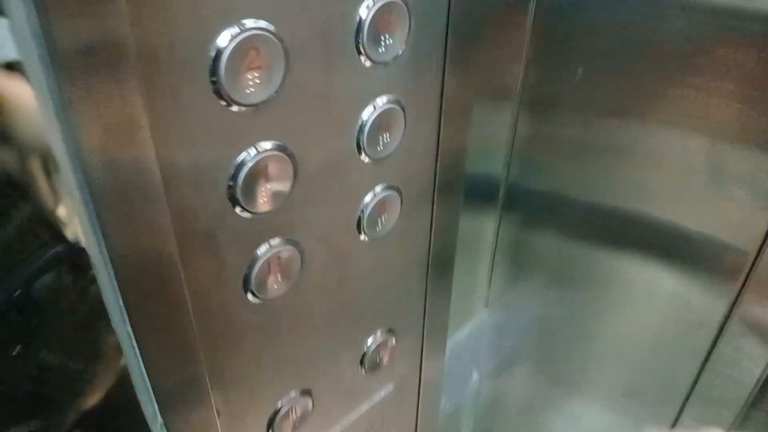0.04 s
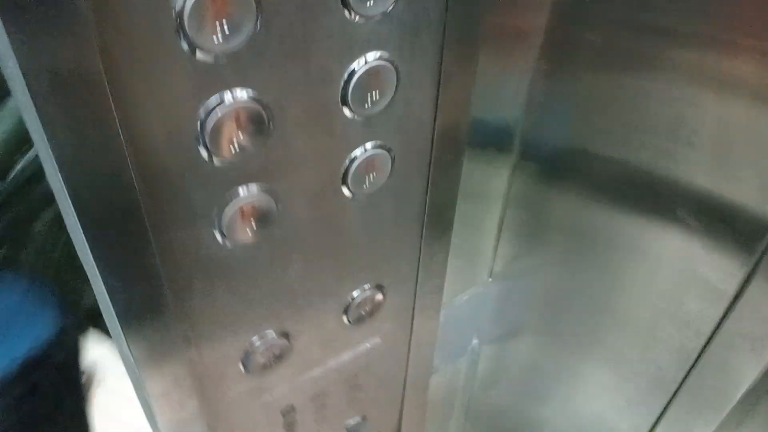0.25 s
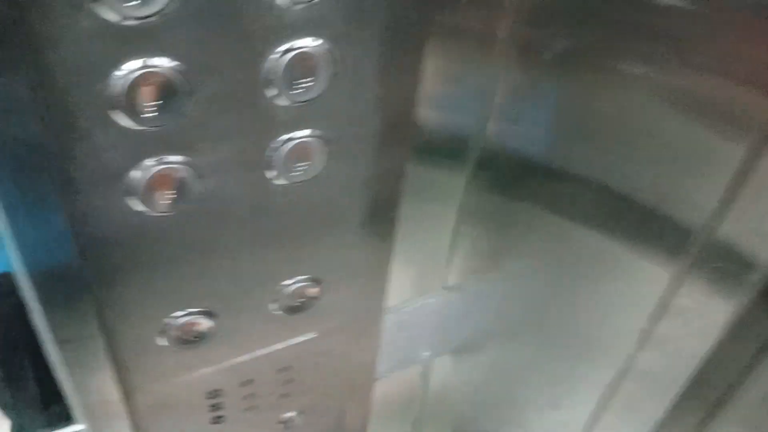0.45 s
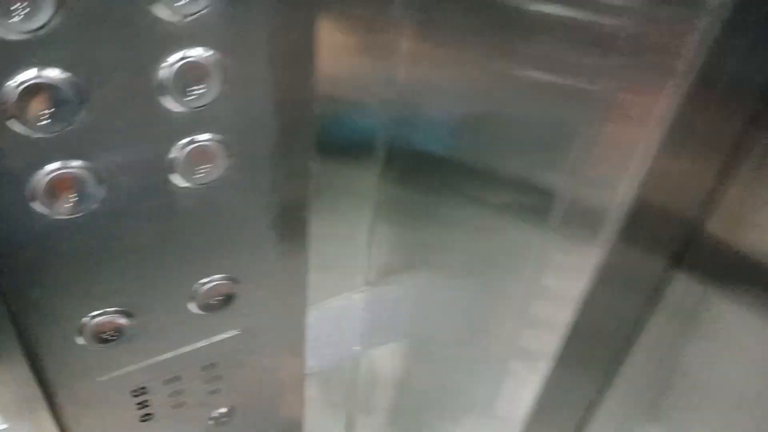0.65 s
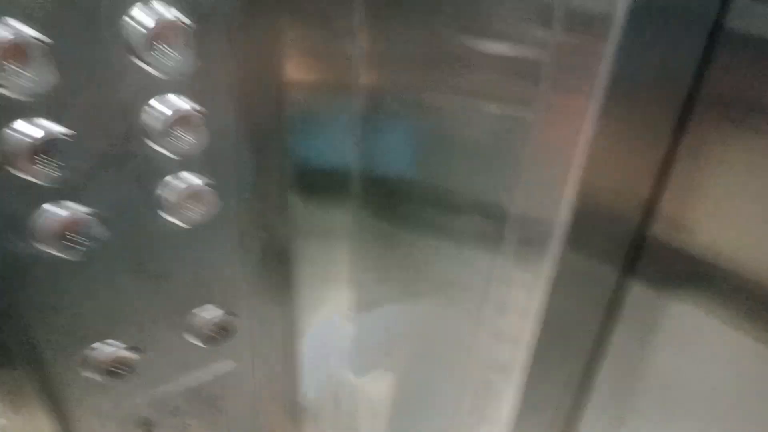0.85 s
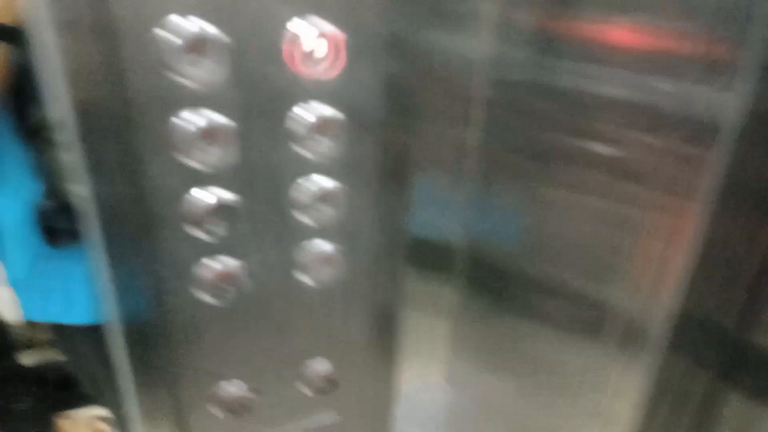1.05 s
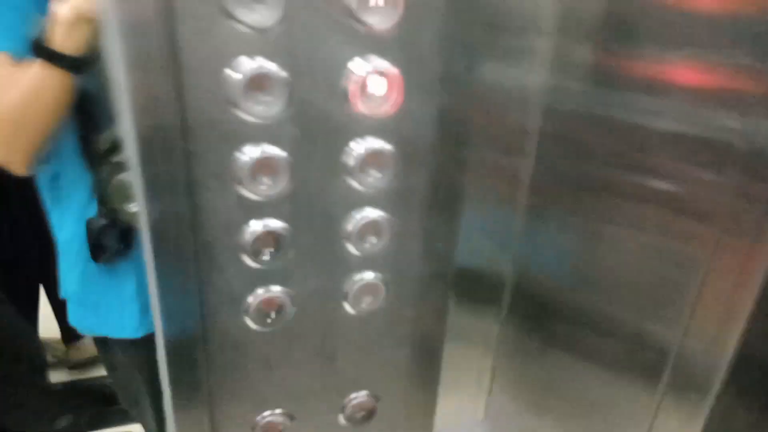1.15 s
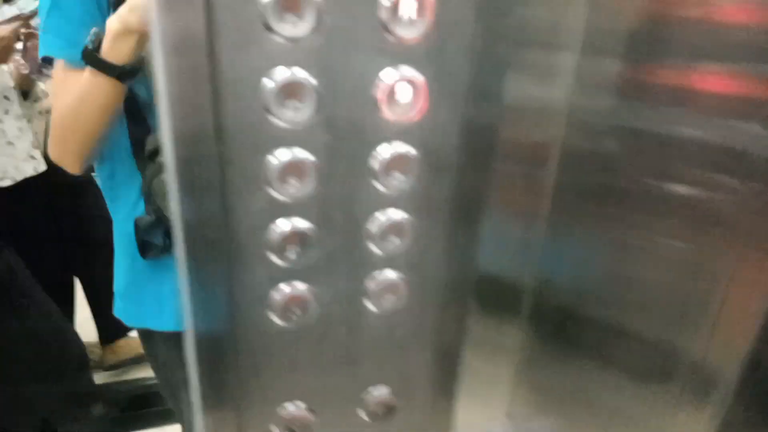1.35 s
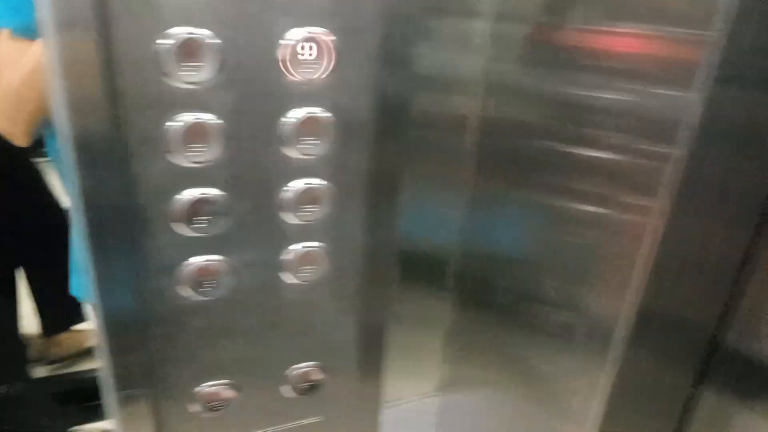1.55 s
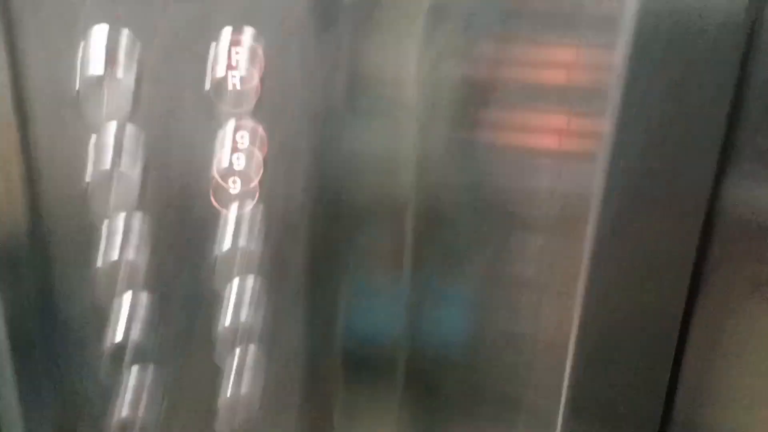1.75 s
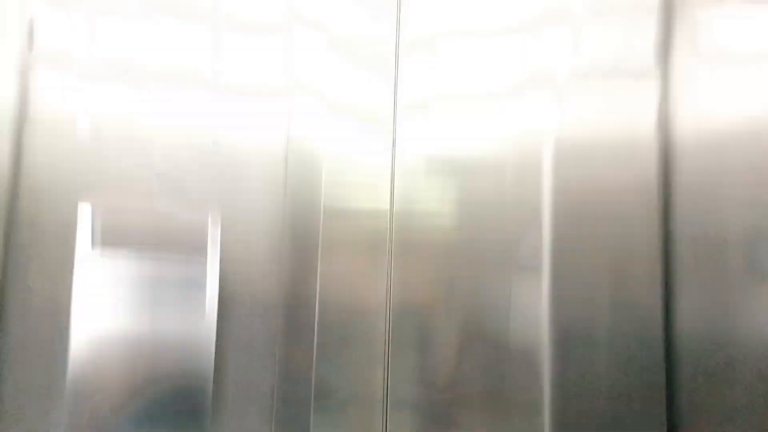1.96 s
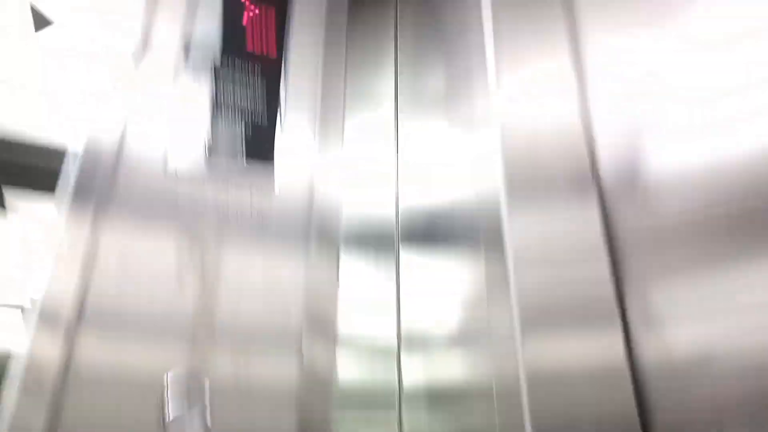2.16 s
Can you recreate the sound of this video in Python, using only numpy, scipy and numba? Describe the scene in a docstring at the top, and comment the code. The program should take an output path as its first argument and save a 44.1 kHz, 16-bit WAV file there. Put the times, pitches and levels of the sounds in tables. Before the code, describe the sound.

Lift doors slide shut with scraping and rumble, then meet with a dull metallic knock

```python
"""Lift doors closing

Inside a small steel lift car, heard by a hand-held phone: noise rings the rolling door parts and scrapes and
hisses along their tracks; the leaves meet with a dull knock of damped swings, rebound and latch with ringing
ticks. Shaped noise makes cloth, scuffs, air and shaft rumble; scattered clicks make a grip shifting on the
phone. A faint steady whine lies high up."""
import sys
import numpy as np
from scipy import signal
from scipy.fft import rfft, irfft
from scipy.io import wavfile
from scipy.ndimage import uniform_filter1d
from numba import njit

SR = 44100
rng = np.random.default_rng(int(sys.argv[2]) if len(sys.argv) > 2 else 0)


def volts_from_decibels(level):
    """Turn decibel levels (scalar or array-like) into linear amplitude factors."""
    exponent = np.asarray(level, float) / 20
    return 10 ** exponent


def output_pcm(signal):
    """Save a mono or channel-first signal as 16-bit PCM at the path in sys.argv[1].

    Samples are clipped to [-1, 1] before scaling.
    """
    pcm = np.clip(np.atleast_2d(signal).T, -1, 1) * 32767
    wavfile.write(sys.argv[1], SR, np.round(pcm).astype(np.int16))


N = 97284


def level(x, db):
    """Scale to an rms level."""
    return x * volts_from_decibels(db) / np.sqrt(np.mean(x ** 2))


def curve(table, column=1):
    """One column of a table, joined by straight lines in time."""
    rows = np.array(table, float)
    return np.interp(np.arange(N) / SR, rows[:, 0], rows[:, column])


def walk(rate_per_s):
    """Slow smoothed chance with a new draw rate_per_s times a second; spread 1."""
    hold = int(SR / rate_per_s)
    steps = np.repeat(rng.standard_normal(N // hold + 2), hold)
    x = uniform_filter1d(uniform_filter1d(steps, hold), hold)[:N]
    return x / x.std()


def coloured(colour, grain_db=0., per_s=800., patchy_db=0.):
    """Noise of unit rms with a given spectrum; grains vary by grain_db, time-frequency patches by patchy_db."""
    patch_hz, patch_s, size = 256.5, .04, 512
    grains = rng.standard_normal(N) * volts_from_decibels(grain_db * walk(per_s))
    z = signal.stft(grains, nperseg=size)[2]
    patch = uniform_filter1d(rng.standard_normal(z.shape), max(int(patch_hz * size / SR), 1), axis=0)
    patch = uniform_filter1d(patch, max(int(patch_s * SR * 2 / size), 1), axis=1)
    patchy = signal.istft(z * volts_from_decibels(patchy_db * patch / patch.std()), nperseg=size)[1][:N]
    rows = np.array(colour, float)
    hz = np.maximum(np.fft.rfftfreq(N, 1 / SR), 1)
    colour_db = np.interp(np.log(hz), np.log(rows[:, 0]), rows[:, 1], right=-90)
    return level(irfft(rfft(patchy) * volts_from_decibels(colour_db), N), 0)


@njit
def svf(x, hz, width_hz):
    """State-variable band-pass whose centre may move."""
    y, band, low = np.empty(len(x)), 0., 0.
    for i in range(len(x)):
        g, k = np.tan(np.pi * hz[i] / SR), width_hz / hz[i]
        v = (band + g * (x[i] - low)) / (1 + g * (g + k))
        band, low, y[i] = 2 * v - band, low + 2 * g * v, k * v
    return y


def add(out, start_s, x):
    """Mix a short sound in at a time."""
    i = int(start_s * SR)
    out[i:i + len(x)] += x[:N - i]


def rolling(table, width_hz, skirt_db):
    """Roller noise rings a resonance that follows the table's pitch and dies away after its last row."""
    stop_s = 0.09  # time constant
    hz, noise = curve(table, column=2), rng.standard_normal(N)
    narrow = svf(svf(noise, hz, width_hz), hz, 2. * width_hz)
    skirt = svf(svf(noise, hz, 260.0), hz, 320.0)
    ring = level(narrow, 0) + level(skirt, skirt_db)
    even = ring / (uniform_filter1d(ring ** 2, 2500) ** 0.33 + 1e-9)  # swells partly evened out
    after_s = np.maximum(np.arange(N) / SR - table[-1][0], 0)
    return level(even, 0) * volts_from_decibels(curve(table)) * np.exp(-after_s / stop_s)


def rumble():
    """Low noise of shaft and car, its level moving in time."""
    # shaft and car rumble: time_s, level_db
    envelope = [(0, -47), (.13, -42.5), (.21, -46), (.5, -45.5), (.93, -50), (.98, -57), (1.03, -47.5),
                (1.4, -48), (1.6, -48), (1.8, -54), (1.85, -65), (1.9, -49), (2.05, -46.5), (2.2, -54.5)]
    # rumble spectrum: freq_hz, relative density_db per Hz
    colour = [(15, -8), (30, 9), (60, -5.5), (90, 3), (130, -5.5), (250, -21), (900, -42.5)]
    return coloured(colour) * volts_from_decibels(curve(envelope))


def air():
    """Steady noise of the car's air, streaked by the phone's noise suppression, with a faint whine high up."""
    # air spectrum: freq_hz, relative density_db per Hz
    colour = [(150, -7.5), (300, 7.5), (600, -31), (1500, -16), (4400, -34), (6500, -10.5), (10000, -5),
              (12000, -50), (16000, -34)]
    whine_hz, whine_width_hz, whine_db = 10110., 15., -73.5
    whine = svf(rng.standard_normal(N), np.full(N, whine_hz), whine_width_hz)
    return coloured(colour, patchy_db=5.0) * volts_from_decibels(-64) + level(whine, whine_db)


def cloth():
    """Cloth brushing near the phone: grainy broadband noise in strokes."""
    # brushing strokes: time_s, level_db
    envelope = [(0, -81), (.06, -65), (.14, -47.5), (.19, -54.5), (.23, -73), (.28, -57.5), (.39, -50),
                (.52, -49.5), (.67, -48), (.72, -60), (.78, -65), (.93, -71), (.975, -56.5), (1.02, -66.5),
                (1.13, -80), (1.15, -51), (1.18, -71), (1.235, -57.5), (1.25, -53), (1.265, -60),
                (1.29, -61.5), (1.35, -57), (1.45, -72), (1.98, -75.5), (2.2, -66)]
    # cloth spectrum: freq_hz, relative density_db per Hz
    colour = [(1200, -23), (2000, 1.5), (4300, 2.5), (6100, 2.5), (10300, 4), (12500, -4), (16000, -15.5)]
    return coloured(colour, grain_db=1.5, per_s=240, patchy_db=3.5) * volts_from_decibels(curve(envelope))


def crackle():
    """A grip shifting on the phone: tiny clicks, each a sub-millisecond puff, ring the microphone port."""
    start_s, end_s, fade_s, clicks_per_s = 1.985, 2.125, 0.037, 560
    floor_db, spread_db = -45, 2.5  # click drive ahead of the filters
    port_hz, port_width_hz, puff_s = 10000., 1240., 0.00073
    t, chance = np.arange(N) / SR, rng.random((2, N))
    fade = np.clip(np.minimum(t - start_s, end_s - t) / fade_s, 0, 1)
    strength = volts_from_decibels(floor_db - spread_db * np.log(chance[1] + 0.0012))
    clicks = (chance[0] < clicks_per_s / SR) * fade * strength
    puffs = signal.lfilter([1], [1, -np.exp(-1 / (puff_s * SR))], clicks) * rng.standard_normal(N)
    port = svf(puffs, np.full(N, port_hz), port_width_hz)
    edge = np.diff(puffs, n=5, prepend=np.zeros(5))  # extreme treble
    return port + 0.012 * edge


def scuffs():
    """Gritty bright noise, quick to start and slower to die."""
    # short scuffs: start_s, level_db, rise_s, t60_s
    events = [(1.077, -48, 0.0015, 0.46), (1.239, -47.5, 0.0036, 0.3), (1.488, -42, 0.0044, 0.22),
              (1.580, -52, 0.041, 0.56), (1.799, -54, 0.0081, 0.31), (2.160, -53.5, 0.012, 0.25)]
    # scuff spectrum: freq_hz, relative density_db per Hz
    colour = [(4000, -49), (5500, -20), (6700, 0), (8900, -3), (10500, -4.5), (12200, -29), (15000, -41)]
    gain, t = np.zeros(N), np.arange(SR // 2) / SR
    for start_s, db, rise_s, t60_s in events:
        add(gain, start_s, volts_from_decibels(db - 60 * t / t60_s) * (1 - np.exp(-t / rise_s)))
    return gain * coloured(colour, grain_db=2.0, per_s=950, patchy_db=4.5)


def hiss():
    """Door seals sliding: finely grained treble noise."""
    # seal hiss: time_s, level_db
    envelope = [(0, -55), (.15, -45.5), (.21, -52), (.29, -52), (.4, -45), (.46, -50.5), (.52, -41),
                (.6, -47.5), (.67, -40.5), (.75, -54.5), (.98, -51), (1.2, -56), (1.36, -50.5),
                (1.46, -62.5), (1.6, -68), (1.68, -63.5), (1.74, -83), (1.92, -83), (2.2, -80)]
    # hiss spectrum: freq_hz, relative density_db per Hz
    colour = [(3500, -27), (5200, -12), (6200, 0), (7000, -7.5), (8000, -14.5), (9800, -15.5), (11500, -43),
              (14000, -38)]
    return coloured(colour, grain_db=1.0, per_s=300, patchy_db=3.0) * volts_from_decibels(curve(envelope))


def scrape():
    """Door shoes scraping in the sill: gritty contact noise and the sheet-metal modes that it rings."""
    # scraping strength: time_s, level_db
    envelope = [(0, -54), (.06, -46.5), (.2, -59), (.32, -52.5), (.45, -58.5), (.48, -53), (.57, -57),
                (.61, -52.5), (.66, -78), (.74, -69), (.79, -56), (.87, -51), (.96, -66.5), (1.03, -101),
                (1.11, -65.5), (1.13, -51), (1.18, -66), (1.22, -70), (1.25, -54.5), (1.28, -72),
                (1.33, -62), (1.4, -77.5), (2.0, -77), (2.08, -67.5), (2.2, -77)]
    # grit spectrum: freq_hz, relative density_db per Hz
    colour = [(400, 5), (650, -11.5), (1300, -1), (2600, -18.5), (5000, -22)]
    # sheet-metal modes: mode_hz, relative level_db
    modes = [(540, 4), (660, 3), (885, -1.5), (955, -5.5), (1100, -8), (1290, -2.5), (1500, -4), (2200, -7),
             (2750, -11.5), (3500, -9), (4200, -6.5)]
    mode_q, flicker_db, flicker_per_s, grit_db = 15, 7.5, 25, -2.5
    ring = 0
    for hz, db in modes:
        mode = signal.lfilter(*signal.iirpeak(hz, mode_q, fs=SR), rng.standard_normal(N))
        flicker = volts_from_decibels(flicker_db * np.tanh(walk(flicker_per_s)))  # each mode swells and fades by itself
        ring = ring + level(mode, db) * flicker
    grit = coloured(colour, grain_db=5.0, per_s=230, patchy_db=4.5)
    return (level(ring, 0) + volts_from_decibels(grit_db) * grit) * volts_from_decibels(curve(envelope))


def sway():
    """Lower sway of the panels: a fixed resonance rung by roller noise."""
    # panel sway: time_s, level_db
    envelope = [(0, -73), (.09, -50), (.13, -77), (.21, -71), (0.235, -33.5), (.28, -57), (.37, -43.5),
                (.44, -49.5), (.52, -53.5), (0.643, -33), (.69, -51.5), (.81, -50.5), (.86, -55.5),
                (1.0, -63), (1.07, -77)]
    return rolling([(s, db, 126) for s, db in envelope], 31.4, skirt_db=-24)


def hanger_frame():
    """Door hanger frame shaken by the rollers; it rings higher as the doors near each other."""
    # frame shaking: time_s, level_db
    envelope = [(0, -47), (0.041, -39), (.1, -43), (.19, -52), (.29, -51.5), (.38, -54), (.445, -73.5),
                (0.519, -48), (.57, -68), (.62, -53.5), (.73, -67), (.8, -51), (.855, -44.5), (.885, -52.5),
                (.91, -45), (.98, -51), (1.09, -69.5)]
    start_hz, rise_hz_per_s = 333.7, 29.5
    return rolling([(s, db, start_hz + rise_hz_per_s * s) for s, db in envelope], 53., skirt_db=-11)


def panels():
    """Door panels shaken by their rollers: a resonance that wanders as the doors travel."""
    # panel shaking: time_s, level_db, resonance_hz
    track = [(0, -75, 211), (.15, -42.5, 184), (.2, -59, 187), (.24, -43.5, 187), (.33, -50.5, 206.6),
             (.455, -59.5, 215), (.49, -42.5, 236.6), (.6, -44, 214), (.72, -68, 195), (.8, -42, 179),
             (.86, -63, 187), (1.1, -68, 193)]
    return rolling(track, 24., skirt_db=-14.5)


def ticks():
    """Latch and metal edges: a short ring with a broad splash of noise about the same pitch."""
    # hard ticks: start_s, level_db, pitch_hz, t60_s
    hits = [(.479, -43, 967, 0.11), (0.479, -37.5, 6200, 0.051), (0.549, -46, 2026, 0.11),
            (.600, -48, 645, 0.24), (0.815, -53, 10800, .012), (1.125, -36, 642, 0.033),
            (1.1263, -39, 2320, 0.0092), (1.130, -43, 9500, .007), (1.142, -36.5, 400, 0.043),
            (1.1428, -31, 4000, 0.0031), (1.1476, -26.5, 10060, 0.0057), (1.1474, -31.5, 5560, 0.0084),
            (1.243, -53.5, 12900, 0.064), (1.4932, -33, 9000, 0.0088), (1.68, -57, 612, 0.07),
            (1.707, -58, 12800, 0.027), (1.439, -62, 4100, 0.23)]
    # modes of one last small snap: level_db, pitch_hz, t60_s
    snap_modes = [(-42.5, 1054, 0.028), (-40.5, 1950, 0.007), (-45.5, 3200, 0.004)]
    snap_s, all_splash_hz, rise_s = 2.0652, 4700, .0001
    out, t = np.zeros(N), np.arange(4000) / SR
    rows = [(snap_s, *mode) for mode in snap_modes] + hits
    for start_s, db, hz, t60_s in rows:
        centre, width_hz = np.full(len(t), 1. * hz), min(hz * .6, 3000.)
        noise = rng.standard_normal(len(t))
        splash = level(svf(svf(noise, centre, width_hz), centre, width_hz), 1)
        share = min(hz / all_splash_hz, 1) ** 4  # lower ticks ring more
        shape = volts_from_decibels(db - 60 * t / t60_s) * (1 - np.exp(-t / rise_s))
        add(out, start_s, shape * ((1 - share) * np.cos(2 * np.pi * hz * t) + share * splash))
    return out


def knocks():
    """Each knock is a few swings of the door leaf, first pulling away, soon choked by rubber."""
    # door-leaf knocks: start_s, peak_db, pitch_hz, length_s
    hits = [(1.1170, -27, 161, 0.012), (1.1190, -20, 69.5, 0.035), (1.125, -32.5, 281.5, 0.025),
            (1.2296, -26, 155, 0.0088), (1.236, -32, 78.5, 0.015), (1.245, -34.5, 150, 0.014),
            (1.446, -33, 290, 0.0059), (1.469, -39.5, 184, 0.0075)]
    rise, fall = 0.29, 0.33  # shares of the length
    out = np.zeros(N)
    for start_s, db, hz, length_s in hits:
        t = np.arange(int(length_s * SR)) / SR
        ramp = np.clip(np.minimum(t / rise, (length_s - t) / fall) / length_s, 0, 1)
        shape = np.sin(np.pi / 2 * ramp) ** 2
        add(out, start_s, -volts_from_decibels(db) * shape * np.sin(2 * np.pi * hz * t))
    return out


def scene():
    """Doors, hands and car together, one channel."""
    car = rumble() + air()
    hands = cloth() + crackle()
    sliding = scuffs() + hiss() + scrape()
    doors = sway() + hanger_frame() + panels()
    return (car + hands + sliding + doors + ticks() + knocks())[None]


def band_limit(x):
    """A steep low-pass at the top of the band."""
    return signal.sosfilt(signal.butter(12, 16480, fs=SR, output="sos"), x)


def record(dry):
    """The phone cuts the top with a steep low-pass."""
    low_pass = signal.ellip(8, .2, 60, 15900, fs=SR, output="sos")
    return band_limit(signal.sosfilt(low_pass, dry))


dry = scene()
out = record(dry)
output_pcm(out)
```